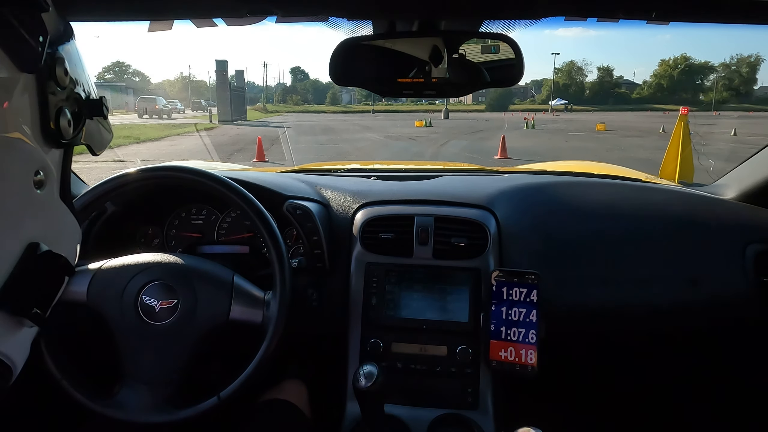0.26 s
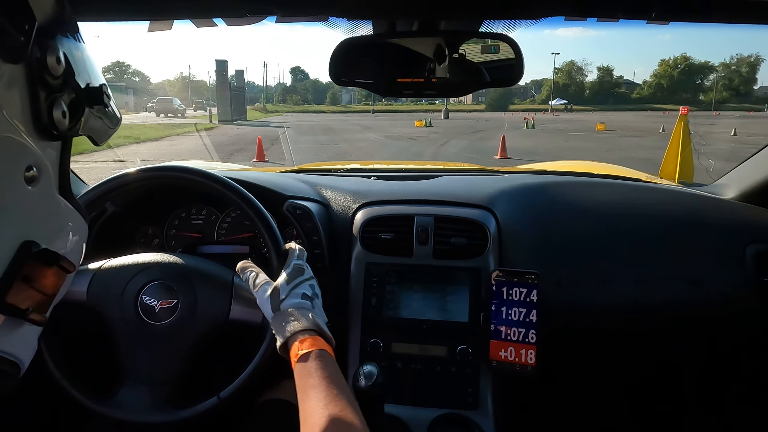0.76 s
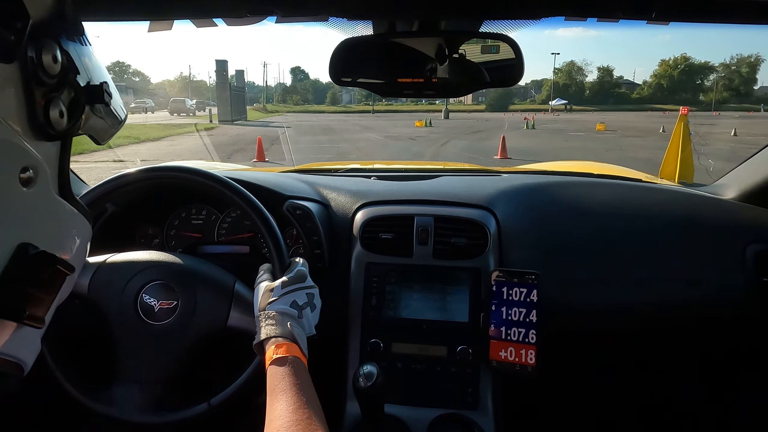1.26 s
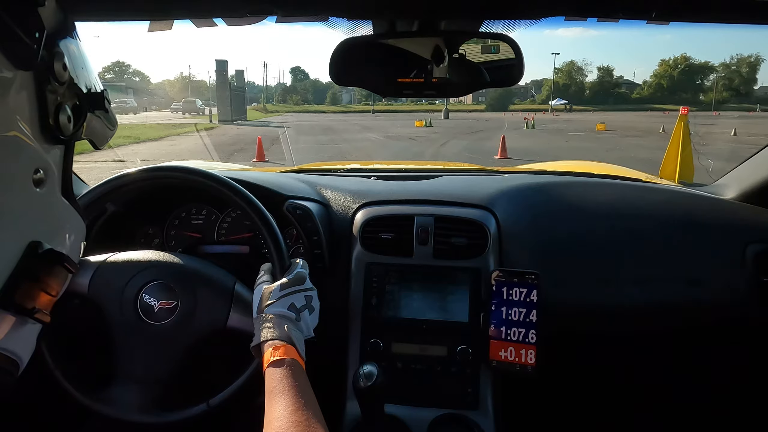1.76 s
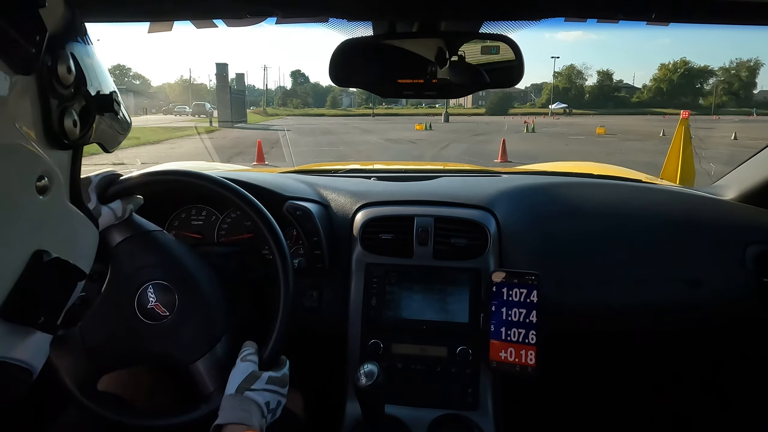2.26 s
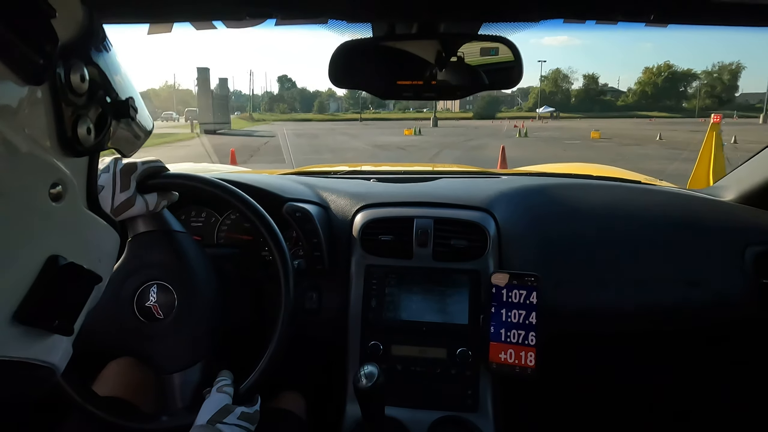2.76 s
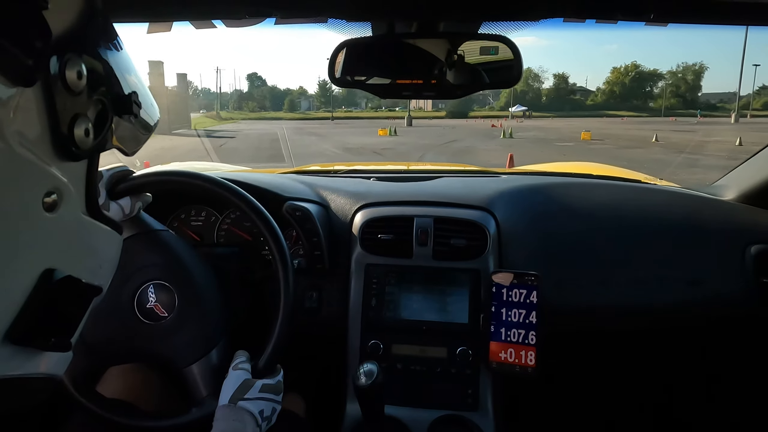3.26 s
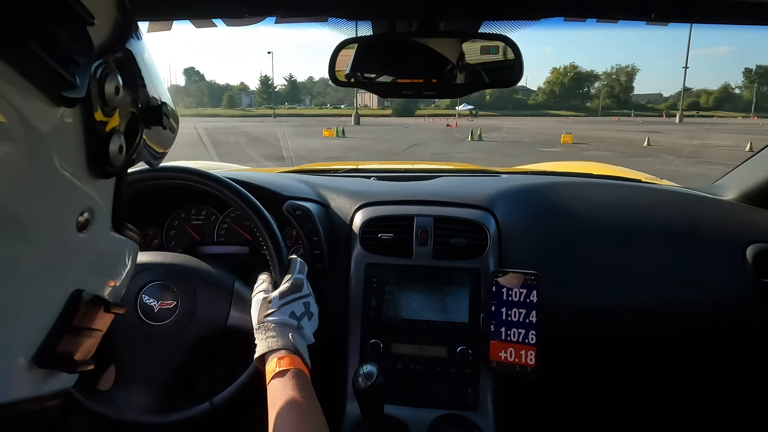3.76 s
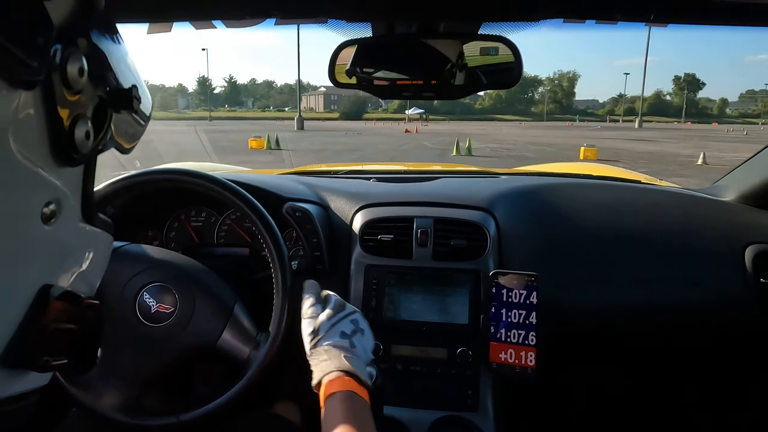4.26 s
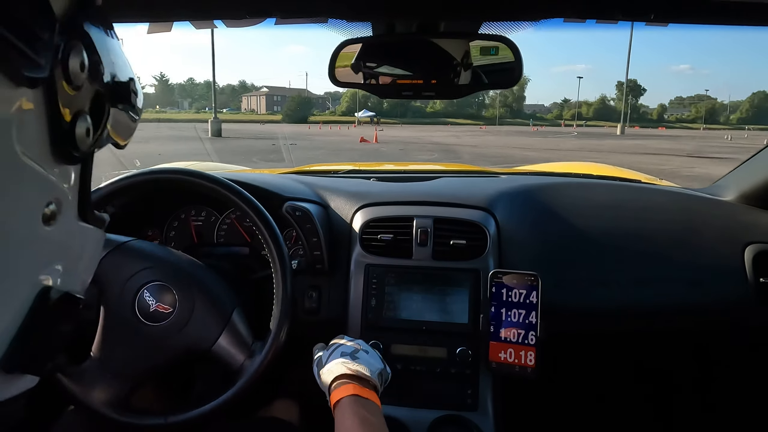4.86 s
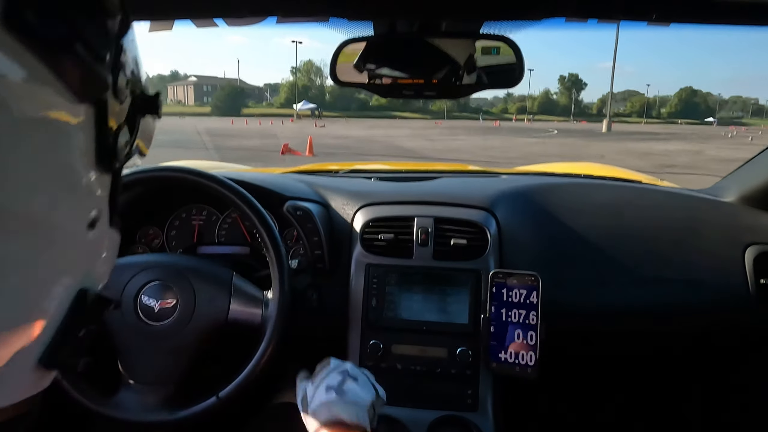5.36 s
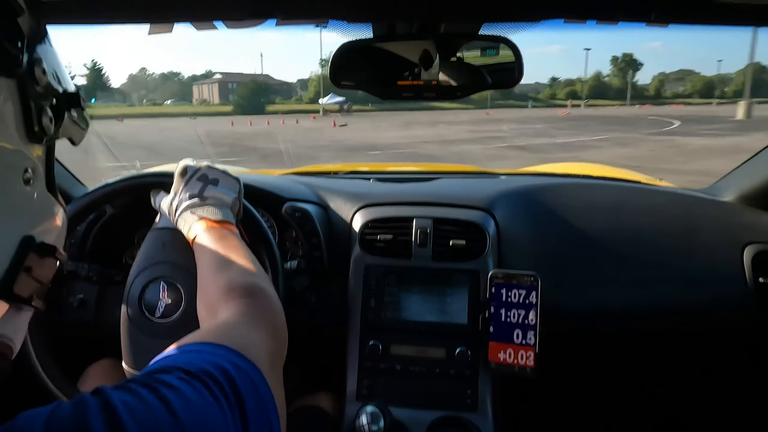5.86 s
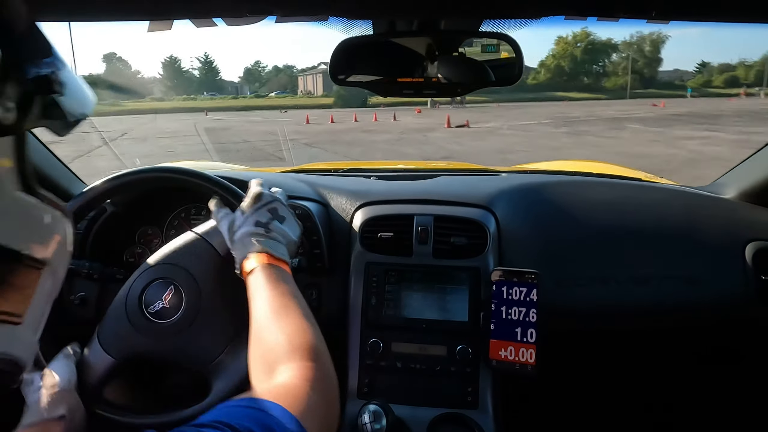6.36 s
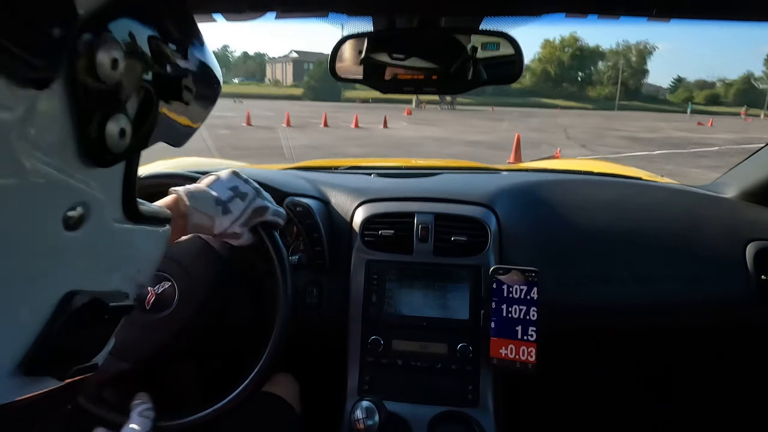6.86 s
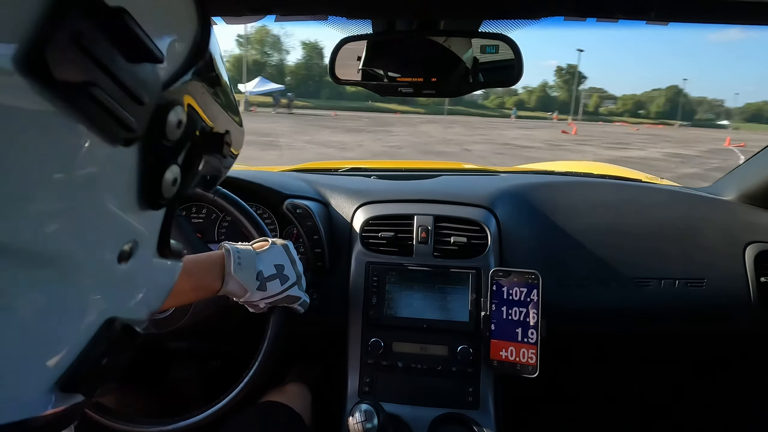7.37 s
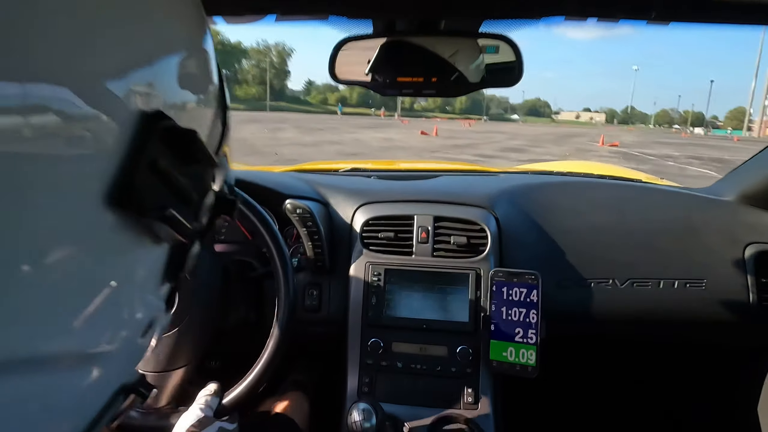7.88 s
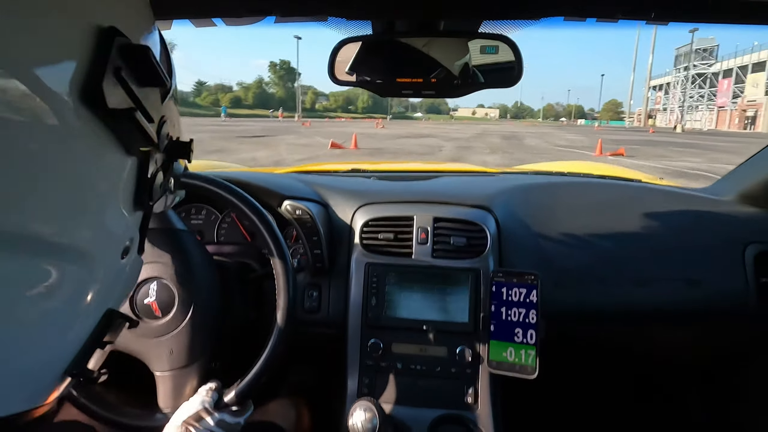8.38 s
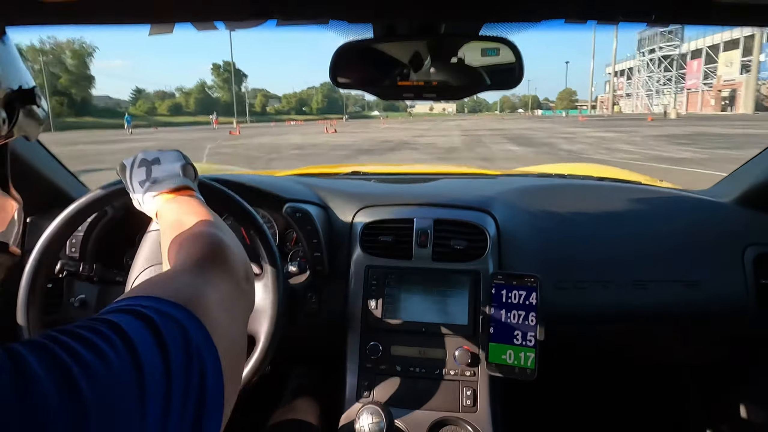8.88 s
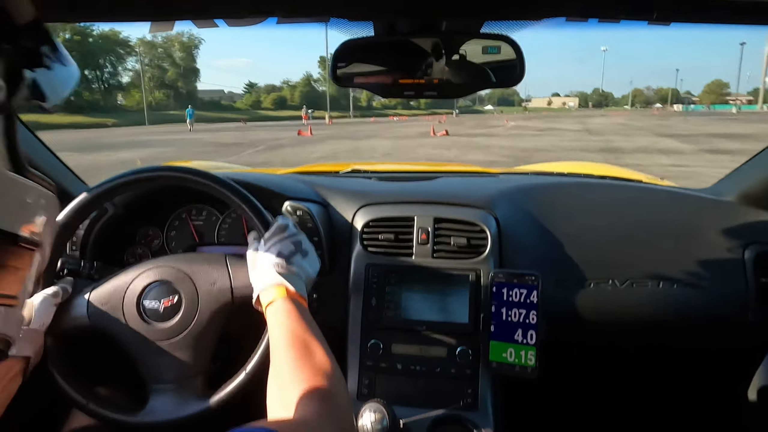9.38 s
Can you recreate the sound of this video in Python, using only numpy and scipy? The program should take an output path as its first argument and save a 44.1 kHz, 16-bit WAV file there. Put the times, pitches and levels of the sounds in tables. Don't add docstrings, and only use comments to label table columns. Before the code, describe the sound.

Throaty V8 heard from the cockpit: steady idle, raspy climb to high revs, sudden lift with lever clunks, faint tyre squeak in a turn, second surge.

```python
import sys
import numpy as np
from scipy import signal
from scipy.fft import rfft, irfft, next_fast_len
from scipy.io import wavfile
from scipy.ndimage import uniform_filter1d, map_coordinates

SR = 44100
rng = np.random.default_rng(int(sys.argv[2]) if len(sys.argv) > 2 else 0)


def amplitude_ratio(level_db):
    exponent = np.asarray(level_db, float) / 20
    return 10 ** exponent


def waveform_to_disk(signal):
    frames = np.transpose(np.atleast_2d(signal))
    scaled = np.clip(frames, -1, 1) * 32767
    samples = np.round(scaled).astype(np.int16)
    wavfile.write(sys.argv[1], SR, samples)


N = 424683
HOLDING = 0.2
MID_REVS_HZ = 52


def unit(x):
    return x / np.sqrt(np.mean(x ** 2) + 1e-20)


def along(points, hz):
    f, v = np.transpose(points)
    return np.interp(np.log(hz + 1), np.log(f + 1), v)


def curves(rows):
    s, *cols = np.transpose(rows)
    return [np.interp(np.arange(N) / SR, s, c) for c in cols]


def humps(events):
    t = np.arange(N) / SR
    return sum(size * np.exp(-((t - s) / half_s) ** 2) for s, size, half_s in events)


def wobble(rate):
    coarse = np.arange(0, N + 8, 8)
    knots = rng.standard_normal(int(N * rate / SR) + 4)
    return map_coordinates(knots, [coarse * rate / SR]).repeat(8)[:N]


def noise():
    return rng.standard_normal((2, N))


def filtered(x, response):
    m = next_fast_len(N + 8192)
    return irfft(rfft(x, m) * response(np.fft.rfftfreq(m, 1 / SR)), m)[..., :N]


def band(f, hz, width):
    return 1j * f * width / (hz * hz - f * f + 1j * f * width)


def ringing(peaks, f, lift):
    return 1 + lift * sum(band(f, c, w) for c, w, db in peaks)


def steady(x, seconds):
    return x / np.sqrt(np.abs(uniform_filter1d(x ** 2, int(seconds * SR))) + 1e-9)


# freq_hz, likeness (0-1)
MIC_LIKENESS = [(60, 0.093), (130, 0.031), (290, 0.41), (640, 0.65), (1410, 0.75), (3100, 0.74),
                (6820, 0.35), (15000, -0.0)]
# freq_hz, left_minus_right_db
MIC_LEAN = [(60, -5), (130, 4.5), (290, -1), (640, -0.5), (1410, -2), (3100, 0), (6820, 4.5),
            (15000, -12.5)]


def stereo(pair, gain):
    m = next_fast_len(N + 8192)
    hz = np.fft.rfftfreq(m, 1 / SR)
    turn = np.arccos(np.clip(1.14 * along(MIC_LIKENESS, hz), 0, 0.97)) / 2
    mid, side = rfft(pair, m) * gain(hz) * [np.cos(turn), np.sin(turn)]
    lean = amplitude_ratio(along(MIC_LEAN, hz) / 2)
    return unit(irfft([(mid + side) * lean, (mid - side) / lean], m)[:, :N])


def law(rule, throttle, crank_hz):
    shut_db, hold_db, open_db, shut_slope, open_slope = rule
    slope = shut_slope + throttle * (open_slope - shut_slope)
    level_db = np.interp(throttle, [0, HOLDING, 1], [shut_db, hold_db, open_db])
    return level_db + slope * np.log2(crank_hz / MID_REVS_HZ)


def engine_load(throttle):
    return np.clip((throttle - HOLDING) / 0.56, 0, 1)


# time_s, crank_hz
CRANK_SPEED = [(0, 34.59), (1.1, 35.39), (1.82, 38.46), (2.21, 39.07), (2.38, 30.5), (2.97, 53.5),
               (3.37, 54.95), (4.25, 69.06), (5.1, 86.92), (5.38, 96.96), (5.9, 73.84), (6.08, 57.9),
               (6.42, 59.05), (6.7, 51.48), (7.2, 46.67), (7.6, 47.62), (8.9, 63.62), (9.63, 78.5)]
# top_s, extra_hz, half_length_s
FLARES = [
    (3.8, 3, .15),
    (4.57, 3, .16),
    (7.74, 3.5, .06),
    (7.92, -2.5, .07),
    (8.1, 1, 0.082),
    (8.3, -1.05, .1),
    (9.16, 5.5, 0.076),
    (9.28, 2.5, 0.095),
]


def crank():
    crank_hz = uniform_filter1d(curves(CRANK_SPEED)[0], SR // 25) + humps(FLARES)
    return crank_hz, np.cumsum(crank_hz * (1 + 0.0012 * wobble(15))) / SR


def cyclic(crank_hz, turns, share, top_hz, renew):
    steps = 512
    age = renew * np.arange(N) / SR
    patterns = rng.standard_normal((2, int(age[-1]) + 2, steps))
    patterns = patterns + 0.25 * np.roll(patterns, steps // 2, axis=2)
    step = (turns / 2 % 1 * steps).astype(int)
    old = age.astype(int)
    fade = age % 1 * np.pi / 2
    repeat = patterns[:, old, step] * np.cos(fade) + patterns[:, old + 1, step] * np.sin(fade)
    repeat *= np.sqrt(steps * crank_hz / (2.2 * SR))
    locked = lambda f: share / (1 + (f / top_hz) ** 4)
    return (filtered(repeat, lambda f: np.sqrt(locked(f)))
            + filtered(noise(), lambda f: np.sqrt(1 - locked(f))))


# time_s, rumble_lift_db, boom_lift_db
BUMPS = [(.3, 3, -4), (.62, 3, -3.5), (2.0, 10, 3), (2.43, -1, 2.5), (3.142, 7, -14), (4.05, 11, -3),
         (4.77, 11, -8), (5.38, 5, 4), (5.62, 6, 0), (5.9, -1.5, -1), (6.08, 9, 0), (6.5, 4.5, 4.5),
         (6.72, 12, 9.5), (7.05, 5, -4), (7.29, 2.5, 6)]
BUMP_S = 0.087
# freq_hz, level_db_per_hz
RUMBLE = [(1, -30), (3, -3), (8, 16.5), (28, 3.5), (45, -12), (70, -58), (200, -120)]


def body_rumble():
    shake = np.array([[1], [-0.8]]) * rng.standard_normal(N) + noise()
    rumble = steady(filtered(shake, lambda hz: amplitude_ratio(along(RUMBLE, hz))), seconds=0.236)
    pitch_db = humps((s, lift_db, BUMP_S) for s, lift_db, _ in BUMPS)
    return amplitude_ratio(-20 + pitch_db) * rumble


# freq_hz, level_db_per_hz
BOOM = [(25, -23), (45, 2), (100, -5), (200, -9.5), (300, -14.5), (450, -28.5), (800, -46), (2000, -120)]
# shut_db, holding_db, open_db, shut_db_per_octave, open_db_per_octave (of revs)
BOOM_LAW = (-20.5, -21.5, -14.5, 1, -7)


def cabin_boom(crank_hz, throttle):
    boom = stereo(noise(), lambda hz: amplitude_ratio(along(BOOM, hz)))
    thump_db = humps((s, lift_db, BUMP_S) for s, _, lift_db in BUMPS)
    return amplitude_ratio(law(BOOM_LAW, throttle, crank_hz) + thump_db - 8) * boom


# freq_hz, level_db_per_hz
ROAR = [(150, -42), (240, -11), (300, -12.5), (400, -4.5), (470, -8), (675, -1), (760, -8.5), (850, -2.5),
        (1020, -9), (1410, -4), (1700, -10.5), (1950, -17.5), (2420, -18.5), (4200, -22.5), (4700, -30),
        (8000, -34.5), (12000, -44.5), (15800, -64)]
# freq_hz, width_hz, level_db (not used)
HOLLOW = [(691, 59, 0), (1400, 7.9, -3), (1652, 20, -7), (1930, 11, -13), (2235, 200, -13), (3460, 11, -17)]
# shut_db, holding_db, open_db, shut_db_per_octave, open_db_per_octave (of revs)
ROAR_LAW = (-32, -30, -25, 2.5, -3.5)


def cabin_roar(crank_hz, throttle, beat):
    roar_db = law(ROAR_LAW, throttle, crank_hz)
    beating = np.clip((roar_db + 37) / 8, 0, 1) * beat
    source = (beating + 0.96 * noise()) * amplitude_ratio(1.03 * wobble(40))
    roar = stereo(source, lambda hz: amplitude_ratio(along(ROAR, hz)) * ringing(HOLLOW, hz, lift=0.94))
    return amplitude_ratio(roar_db) * roar


# freq_hz, level_db_per_hz
HISS = [(2940, -45), (5000, -2), (6150, -3), (7170, -7.5), (8950, -15), (11300, -11), (13900, -18.5),
        (15800, -27)]
# shut_db, holding_db, open_db, shut_db_per_octave, open_db_per_octave (of revs)
HISS_LAW = (-100, -62, -49.5, -12, 17.5)


def window_hiss(crank_hz, throttle):
    flutter = amplitude_ratio(1.4 * wobble(30) + 1.8 * wobble(60))
    hiss = stereo(noise() * flutter, lambda hz: amplitude_ratio(along(HISS, hz)))
    return amplitude_ratio(law(HISS_LAW, throttle, crank_hz) + 5.5) * hiss


def bursts(events, t60, tail_t60, tail_db, rise_s):
    out = np.zeros((2, N + SR))
    t = np.arange(SR // 8) / SR
    for s, db, pan_db in events:
        near, apart = rng.standard_normal(len(t)), rng.standard_normal((2, len(t)))
        crack = amplitude_ratio(-60 * t / t60) * near
        scuff = amplitude_ratio(tail_db - 60 * t / tail_t60) * (near + 1.9 * apart)
        gain = amplitude_ratio(db + np.array([[pan_db], [-pan_db]]) / 2)
        out[:, round(s * SR):][:, :len(t)] += gain * (crack + scuff) * (1 - np.exp(-t / rise_s))
    return out[:, :N]


# start_s, peak_db, left_minus_right_db
TICKS = [(6.0896, -47, -3.5), (6.125, -40, -6), (6.1496, -48, -2.5), (6.4223, -39, -5.0),
         (6.4483, -45, -3.0), (6.4994, -41, -9), (6.6228, -51, -11), (6.6398, -36, -11), (6.6717, -37, -7),
         (6.7052, -32, -5), (6.7394, -44, -3.5), (6.7768, -39, -3.0), (7.0561, -47, -4),
         (7.1244, -50, -2.5), (7.3647, -45, -3.0), (7.457, -44, -2.0)]


def trim_ticks():
    thin = lambda hz: amplitude_ratio(-2.5) * (1j * hz / 7000 / (1 + 1j * hz / 7000)) ** 2
    return filtered(bursts(TICKS, t60=0.019, tail_t60=0.14, tail_db=-2.5, rise_s=0.004), thin)


# start_s, peak_db, left_minus_right_db
THUDS = [
    (7.628, -12, 0),
    (7.988, -12, 0),
]


def driveline_thuds():
    floor = lambda hz: band(hz, 750, 702)
    return filtered(bursts(THUDS, t60=0.04, tail_t60=0.099, tail_db=-2, rise_s=0.003), floor)


# start_s, peak_db, left_minus_right_db
CLUNKS = [(3.5567, -33, -15), (5.3868, -33, 0.0), (5.4262, -27, 4), (5.5065, -4, 3), (5.5134, -8, -1),
          (5.583, -35, 2), (5.6053, -25, 5), (5.6391, -29, 0.0), (5.678, -27, 0.5), (5.7759, -36, -0.5),
          (6.5564, -30, -2), (7.311, -21, 5), (7.5606, -25, 7)]


def linkage_clunks():
    dull = lambda hz: amplitude_ratio(-2.5) * ringing(PIPE, hz, lift=2.7) / (1 + 1j * hz / 6500) ** 3
    return filtered(bursts(CLUNKS, t60=0.011, tail_t60=0.014, tail_db=-10, rise_s=0.0002), dull)


# start_s, length_s, ring_db, scrape_db
STROKES = [
    (5.39, .004, -31, -48),
    (5.41, 0.041, -28, -38),
    (5.51, .008, -20, -36),
    (5.572, 0.038, -35, -34),
    (5.601, .11, -25, -36),
    (5.775, .03, -35, -50),
]
# freq_hz, width_hz, level_db
CONSOLE = [
    (703, 23, 5.5),
    (1640, 38, -3.5),
    (2850, 110, -16),
]


def gear_lever():
    t = np.arange(N) / SR
    grains = rng.standard_normal(N) * amplitude_ratio(4.5 * wobble(900))
    modes = lambda f: sum(amplitude_ratio(db) * band(f, c, w) for c, w, db in CONSOLE) / (1 + (f / 4200) ** 4)
    rub = lambda f: band(f, 2500, 1900) / (1 + (f / 5000) ** 6)
    ring = steady(filtered(grains, modes), seconds=0.012)
    scrape = unit(filtered(grains, rub))
    out = np.zeros(N)
    for s, length, ring_db, scrape_db in STROKES:
        rise_db = -2200 * np.maximum(s - t, 0)
        fall_db = -650 * np.maximum(t - s - length, 0)
        out += amplitude_ratio(rise_db + fall_db) * (amplitude_ratio(ring_db) * ring + amplitude_ratio(scrape_db) * scrape)
    return out * amplitude_ratio([[1.2], [-1.2]])


# start_s, length_s, stick_slip_hz, level_db, octave_db
CHIRPS = [
    (2.995, .04, 2160, -14, -22),
    (6.827, .1, 1400, -33, -14),
    (6.85, .06, 1265, -25, -14),
    (6.908, .05, 1275, -20.5, -14.5),
    (6.94, .045, 1230, -28.5, -13),
]


def tyres():
    out, t = np.zeros(N), np.arange(N) / SR
    sag, edge = 0.015, 0.45
    for s, length, hz, db, octave_db in CHIRPS:
        part = np.clip((t - s) / length, 0, 1)
        slip_hz = hz * (1 - sag * part) * (1 + 0.012 * wobble(200))
        phase = 2 * np.pi * np.cumsum(slip_hz) / SR
        grip = np.clip(np.minimum(part, 1 - part) / edge, 0, 1)
        octave = amplitude_ratio(octave_db) * wobble(350) * np.sin(2 * phase)
        out += grip * amplitude_ratio(db + 4 + 2.6 * wobble(160)) * (np.sin(phase) + octave)
    return out * amplitude_ratio([[0.6], [-0.6]])


# freq_hz, width_hz, level_db (not used)
PIPE = [(783, 14, -4), (1080, 630, -3), (1780, 93, 0), (2457, 150, -5), (3490, 27, -13), (4270, 10, -17),
        (5580, 500, -22), (10850, 89, -33)]
# freq_hz, level_db_per_hz
RASP = [(250, -49), (420, -21), (570, -36), (683, -8), (1060, -1.5), (1500, -15.5), (1800, -4.5),
        (2200, -13), (2560, -1), (3200, -5.5), (4300, -11.5), (4800, -20.5), (6070, -23), (8880, -33.5),
        (11500, -30), (15800, -50)]
# shut_db, holding_db, open_db, shut_db_per_octave, open_db_per_octave (of revs)
RASP_LAW = (-58, -38, -19, 15, 0)
# freq_hz, width_hz
TAILPIPE = [
    (1730, 86),
    (1930, 145),
]
# time_s, heat (0-1)
HEAT = [
    (0, 0),
    (3.9, 0.27),
    (4.6, 0.61),
    (5.3, 0.83),
    (7.7, 0.05),
    (8.2, 0.48),
    (8.8, 0.93),
    (9.63, .9),
]


def exhaust(crank_hz, turns, throttle, beat):
    firing = (4 * turns).astype(int)
    cylinder_db = np.array([0, -3, 1, -2, 2, -4, 0, -1])[firing % 8]
    size_db = cylinder_db + 3 * rng.standard_normal(firing[-1] + 1)[firing]
    puff = 0.36 + amplitude_ratio(size_db) * np.exp(-2.6 * (4 * turns % 1))
    rasp = stereo(puff * beat, lambda hz: amplitude_ratio(along(RASP, hz)) * ringing(PIPE, hz, lift=0.74))
    cool, hot = [stereo(puff * beat, lambda f: np.abs(band(f, hz, w)) ** 2) for hz, w in TAILPIPE]
    heat = np.clip(curves(HEAT)[0], 0, 1)
    tip = np.sqrt(1 - heat) * cool + np.sqrt(heat) * hot
    rasp = rasp + engine_load(throttle) * amplitude_ratio(-7) * tip
    rasp_db = law(RASP_LAW, throttle, crank_hz) - 0.5
    return amplitude_ratio(rasp_db + 0.5 * wobble(16) + 0.9 * wobble(70)) * rasp


# multiple, shut_db, holding_db, open_db, mic_spread_rad
ORDERS = [(.5, -50, -42, -40, 0.7), (1, -36, -31, -28.5, 0.41), (1.5, -48.5, -27.5, -34.5, -0.75),
          (2, -44, -27.5, -30, 0.48), (2.5, -55, -35, -31, -0.48), (3, -46.5, -21.5, -32.5, 0.51),
          (3.5, -67, -35, -36.5, 0.31), (4, -45, -28, -20, -.35), (5, -56, -38, -39.5, 0.5),
          (6, -65, -45, -44, -0.51), (7, -45.5, -50, -41.5, 0.26), (8, -47, -42, -41.5, 0.49),
          (12, -68, -52, -50, -.3), (16, -66, -60, -60, 0.23)]
# freq_hz, width_hz, lift_db
AIRSPACE = [(77.3, 24, 5), (120.3, 20, 3), (147.8, 12, 5), (185.3, 18.7, 6), (287, 23, 3.5), (393, 5, 6.5),
            (681, 29.6, 17)]
# freq_hz, left_minus_right_db
SIDEWAYS = [(100, -0.5), (135, 5.5), (170, 3.5), (205, -6), (225, -8), (255, -1.5), (320, -0.5), (400, -1)]
# time_s, level_db, half_length_s
LULLS = [
    (2.65, -5, .25),
    (3.2, -7.5, .12),
    (3.6, 2.5, .1),
    (4.08, -7.5, 0.16),
    (7.35, -5, 0.16),
    (7.75, -4, .2),
    (9.0, 2.5, .3),
]
# time_s, lift_db, half_length_s
LUGS = [
    (2.33, 4, .1),
    (7.6, 19, .11),
    (7.95, 12, 0.069),
]


def engine_orders(crank_hz, turns, throttle):
    full_throttle = 0.38
    grid_hz = np.arange(1000)
    air_db = sum(db / (1 + ((grid_hz - c) / w) ** 2) for c, w, db in AIRSPACE) - 4.5
    uneven_db = 4.5 * engine_load(throttle) * np.log2(crank_hz / MID_REVS_HZ) + humps(LULLS)
    lug_db = humps(LUGS)
    out = np.zeros((2, N))
    for k, *throttle_db, spread in ORDERS:
        db = np.interp(throttle, [0, HOLDING, full_throttle], throttle_db)
        db = db + np.interp(k * crank_hz, grid_hz, air_db)
        db = db + (uneven_db if k % 4 else lug_db * (k > 4))
        lean_db = along(SIDEWAYS, k * crank_hz) / [[2], [-2]]
        phase = 2 * np.pi * (k * turns + rng.random()) + 0.12 * wobble(9) + np.array([[spread], [-spread]])
        out += np.sqrt(2) * amplitude_ratio(db + lean_db + 1.8 * wobble(6)) * np.sin(phase)
    return out


# time_s, throttle (0-1)
THROTTLE = [(0, 0.19), (2.14, 0.23), (2.24, 0.45), (2.29, .95), (2.88, 0.96), (3.0, 0.77), (3.22, 0.66),
            (3.37, 0.94), (3.61, 0.99), (3.8, 0.92), (5.352, 0.99), (5.362, 0), (6.0, .01), (6.72, 0.16),
            (6.8, 0.02), (7.45, 0.16), (7.62, 0.72), (8.0, .93)]


def scene():
    crank_hz, turns = crank()
    throttle = np.clip(curves(THROTTLE)[0], 0, 1)
    beat = cyclic(crank_hz, turns, share=0.75, top_hz=2200, renew=4)
    surroundings = body_rumble() + cabin_boom(crank_hz, throttle)
    surroundings += cabin_roar(crank_hz, throttle, beat) + window_hiss(crank_hz, throttle)
    contacts = trim_ticks() + driveline_thuds() + linkage_clunks() + gear_lever() + tyres()
    engine = exhaust(crank_hz, turns, throttle, beat) + engine_orders(crank_hz, turns, throttle)
    return surroundings + contacts + engine


def roll_off(x):
    return signal.sosfilt(signal.butter(12, 16380, fs=SR, output="sos"), x)


def record(dry):
    soft = dry / (1 + np.abs(dry / 0.96) ** 6) ** (1 / 6)
    mix = filtered(soft, lambda hz: np.clip((15900 - hz) / 300, 0, 1))
    return roll_off(mix)


dry = scene()
out = record(dry)
waveform_to_disk(out)
```